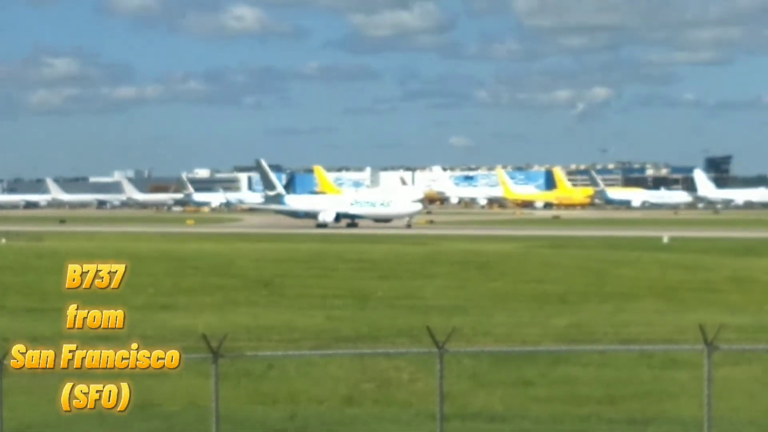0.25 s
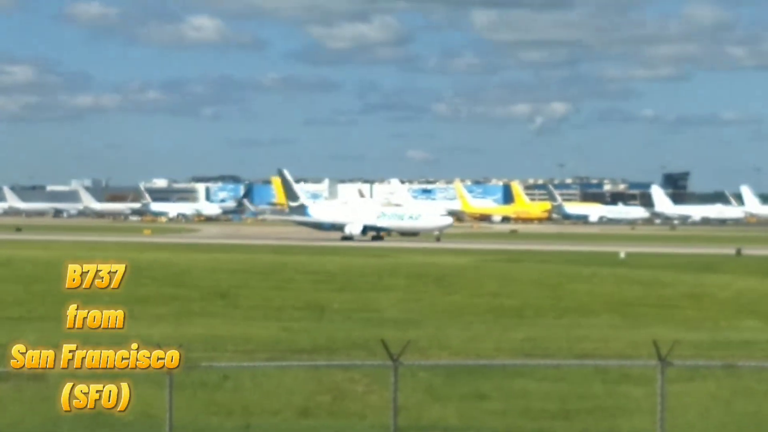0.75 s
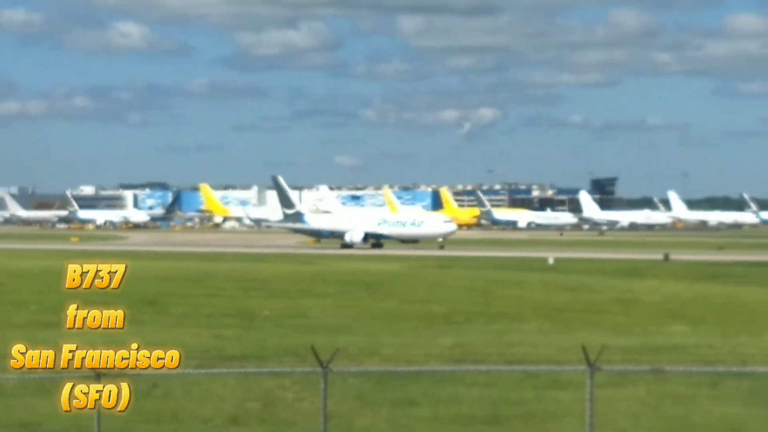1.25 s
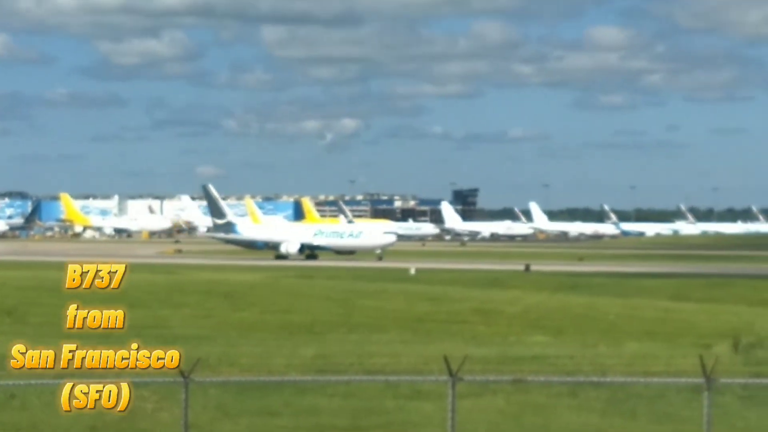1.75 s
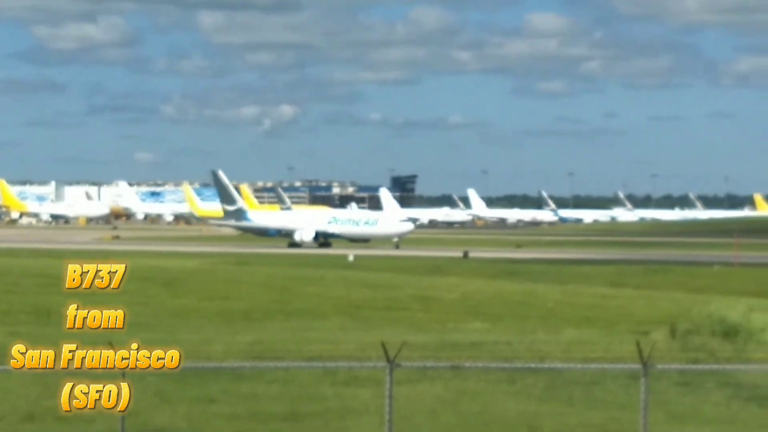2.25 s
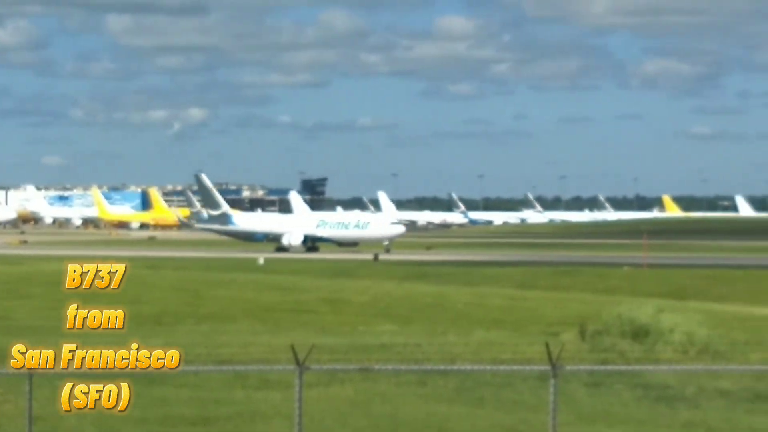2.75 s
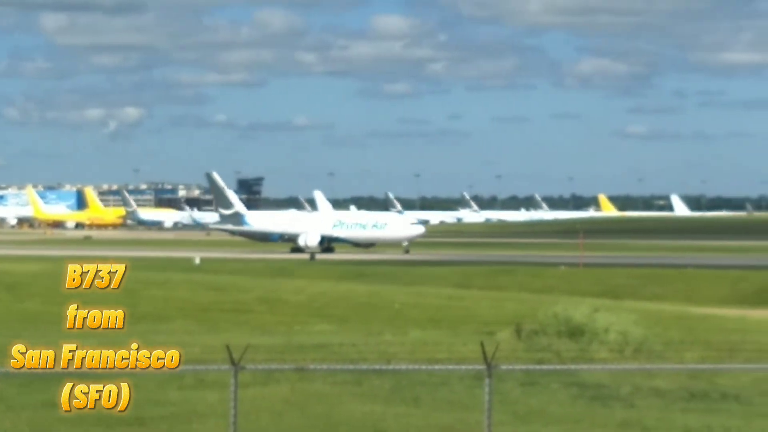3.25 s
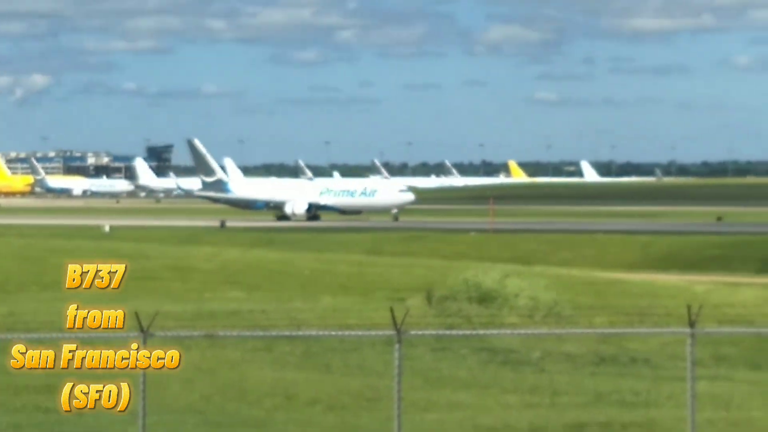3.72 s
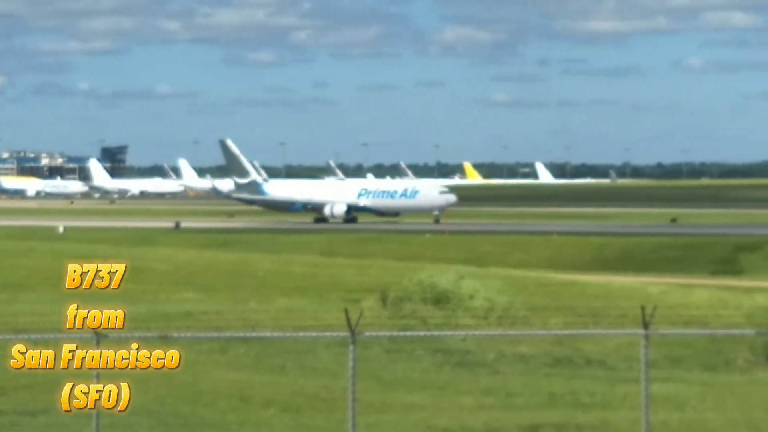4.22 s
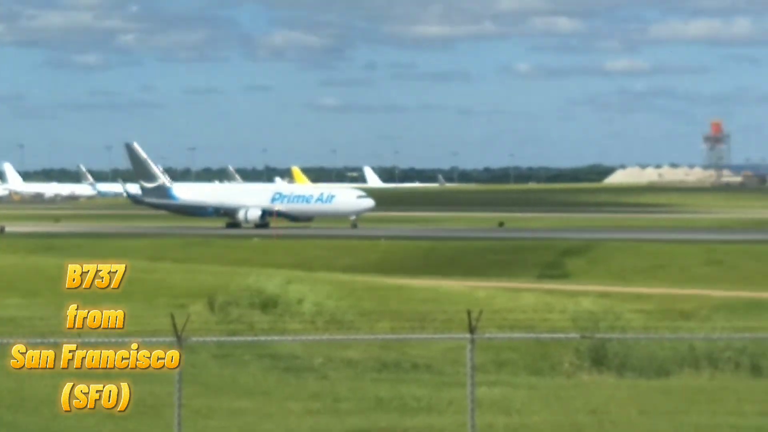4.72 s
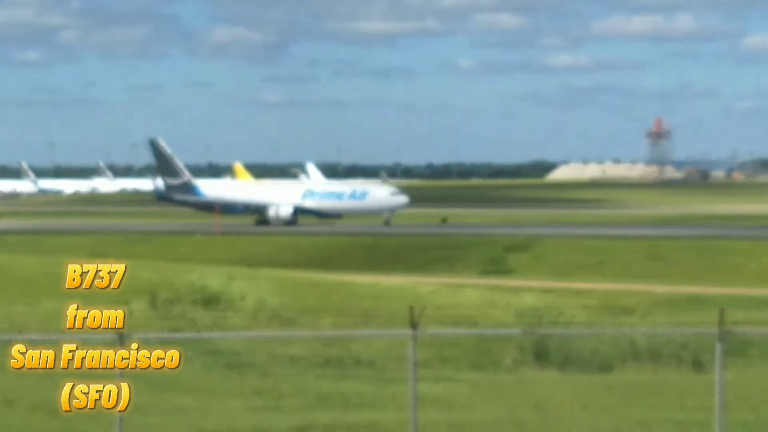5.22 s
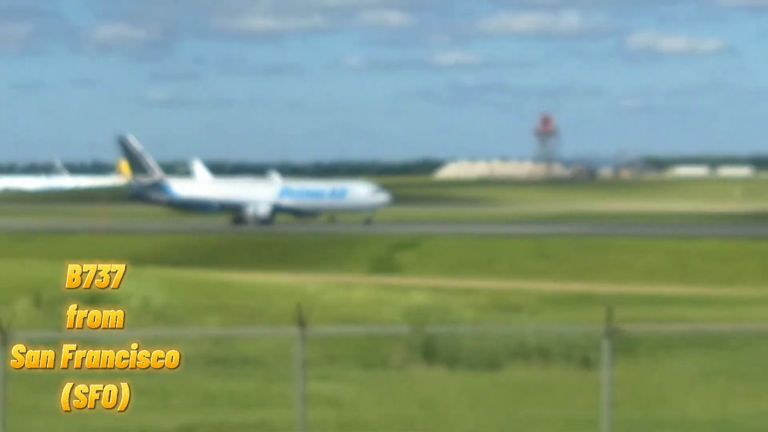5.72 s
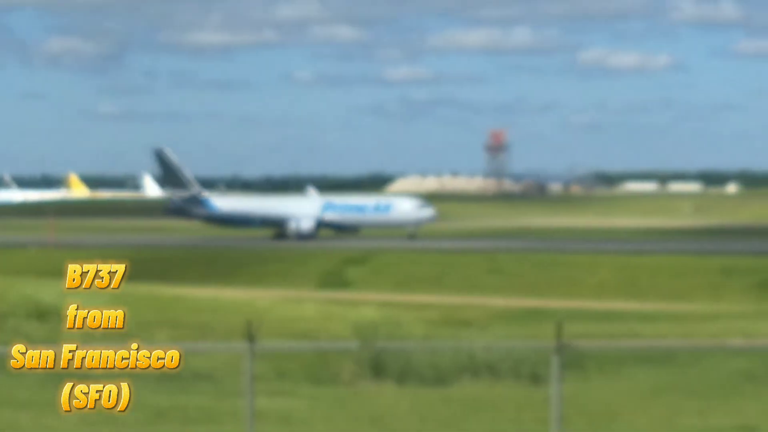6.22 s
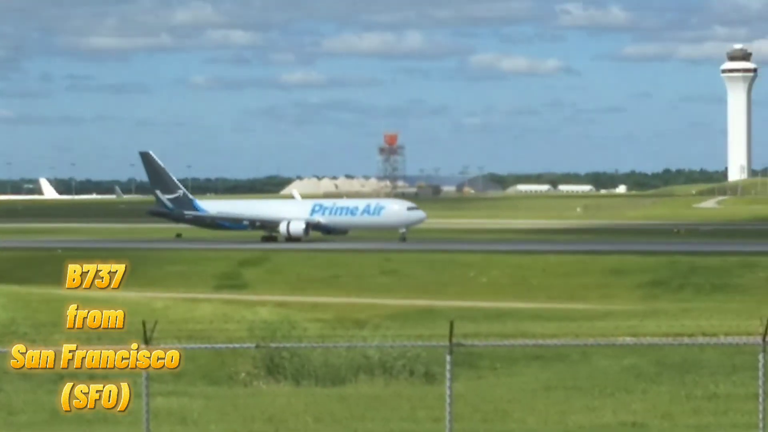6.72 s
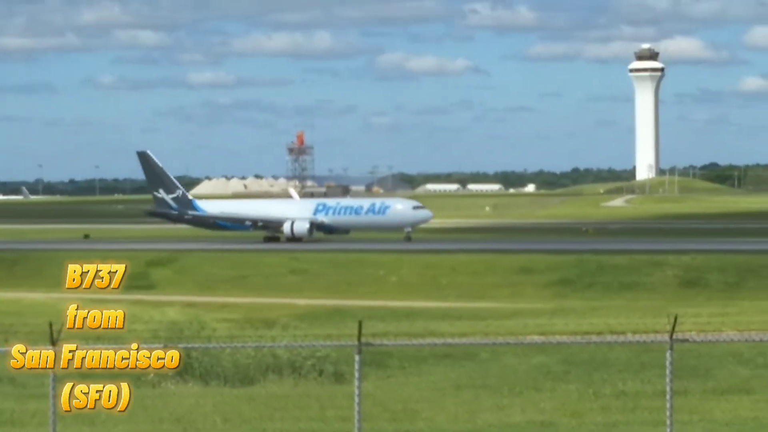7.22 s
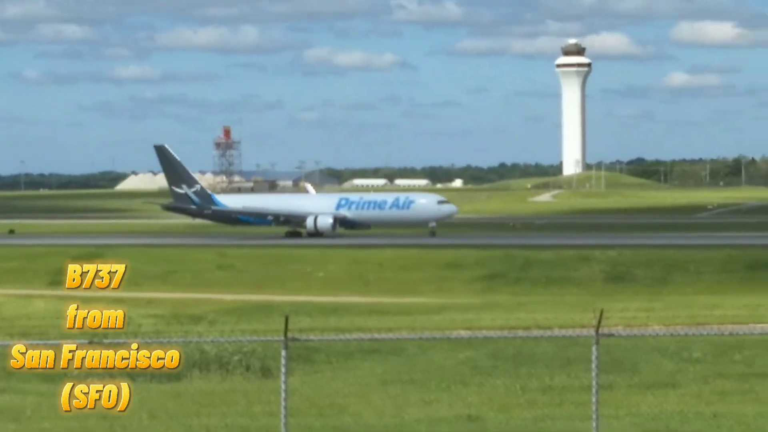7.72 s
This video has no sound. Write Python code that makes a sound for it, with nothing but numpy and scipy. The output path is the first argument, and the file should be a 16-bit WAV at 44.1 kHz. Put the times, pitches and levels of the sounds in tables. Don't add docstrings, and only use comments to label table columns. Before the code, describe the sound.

Two slightly detuned jet fans whine over a wide, airy roar across an open airfield. The whine holds, then slides smoothly lower while the roar weakens, leaving the tone more exposed. Close wind dominates the foreground with dull blows, tearing flutter and small knocks on each side of the stereo phone microphone. Two hard slams come in the first two seconds, momentarily pushing the sound down before it recovers.

```python
import sys
import numpy as np
from scipy import signal
from scipy.fft import rfft, irfft, next_fast_len
from scipy.io import wavfile
from scipy.ndimage import uniform_filter1d

SR = 44100
rng = np.random.default_rng(int(sys.argv[2]) if len(sys.argv) > 2 else 0)


def store_pcm(level_fs):
    pcm = np.round(np.clip(level_fs, -1, 1) * 32767).astype(np.int16)
    wavfile.write(sys.argv[1], SR, np.atleast_2d(pcm).T)


def boost_factor(decibels):
    exponent = np.asarray(decibels, float) / 20
    return 10 ** exponent


N = 351023
SIZE = next_fast_len(N + 2048)
HZ = np.arange(SIZE // 2 + 1) * SR / SIZE
TIME = np.arange(N) / SR


def unit(x):
    return x / np.sqrt(np.mean(x ** 2))


def curves(table):
    s, *columns = np.transpose(table)
    return [np.interp(TIME, s, c) for c in columns]


def over_hz(table, order):
    rows = np.array(table)
    return np.interp(np.log(HZ + 1), np.log(rows[:, 0]), rows[:, order])


def shape(x, response):
    padded = np.pad(x, (0, SIZE - N), "linear_ramp", end_values=x[0])
    return irfft(rfft(padded) * response, SIZE)[:N]


def walk(rate_hz):
    hold = int(SR / rate_hz)
    steps = np.repeat(rng.standard_normal(N // hold + 1), hold)
    return unit(uniform_filter1d(uniform_filter1d(steps, hold), hold)[:N])


# time in seconds, level in dB, treble lift in dB.
JET = [(0, -32.5, -11.5), (.8, -33.5, -6), (1.9, -33.5, -3.5), (2.7, -32.5, -4.5), (3.2, -32.5, -4),
       (3.7, -39, -2), (4.6, -37.5, -1.5), (5.05, -34.5, -0.5), (5.5, -39.5, 2), (6.3, -43, 6.5),
       (6.7, -42.5, 5), (7.45, -44.5, 7.5), (7.96, -46.5, 4.5)]
# frequency in Hz, density in dB per Hz.
ROAR_COLOUR = [(30, 8.5), (90, 18.5), (250, 7.5), (420, -1), (610, 4), (800, 2.5), (1050, -2.5),
               (1400, 1.5), (1800, 0), (2300, 1.5), (3000, -11), (3600, -11), (4500, -22.5), (5800, -39),
               (7500, -63)]


def roar():
    level_db, treble_db = curves(JET)
    gain_db = gain_control()
    body_db = 0.5 - 0.15 * gain_db
    white = rfft(rng.standard_normal((2, SIZE))) * boost_factor(over_hz(ROAR_COLOUR, order=1))
    out, swell = 0, walk(3.276)
    for octave in np.arange(-6, 3, .5):
        window = np.clip(1 - 2 * abs(np.log2((HZ + 1) / 2000) - octave), 0, 1)
        lift_db = treble_db * np.clip(octave - .5, 0, 1) + body_db * np.clip(.5 - octave, 0, 1)
        shimmer_db = .5 * swell + 0.33 * walk(5.0) + 0.95 * walk(14)
        out = out + irfft(white * window, SIZE)[:, :N] * boost_factor(lift_db + shimmer_db)
    return out * boost_factor(level_db + gain_db + 16.5)


# time in seconds, frequency in Hz, level in dB over the roar, overtone in dB re the tone.
FAN = [(0, 2130, -3, -26), (.7, 2115, -3, -26), (1.8, 2105, -7, -26), (3, 2090, -2, -26),
       (4.2, 2065, -2, -24), (4.95, 2062, 1, -22), (5.12, 2040, 2.5, -24), (5.5, 1922, 1.5, -22),
       (5.8, 1828, 5.5, -21), (5.95, 1782, 5.5, -18), (6.3, 1682, 3.5, -14), (6.7, 1580, 4, -17),
       (6.8, 1562, 5.5, -21), (7.1, 1525, 4.5, -22), (7.45, 1468, 2, -16), (7.96, 1415, -12, -20)]


def fans():
    hz, level_db, overtone_db = curves(FAN)
    out = 0
    for trim, lag, engine_db in ((1.004, 0, 1), (1.018, .26, -7)):
        speed = trim + lag * np.clip(1 - hz / 2060, 0, 1)
        smear = 1 + .0015 * walk(3) + .0022 * walk(25) + .011 * walk(170)
        phase = 2 * np.pi * np.cumsum(hz * speed * smear) / SR
        overtone = boost_factor(overtone_db + 1.6 * walk(12) + .6 * engine_db) * np.sin(2 * phase)
        tone = np.sin(phase) + overtone
        out = out + tone * boost_factor(engine_db + 1.9 * walk(18) + .9 * walk(6))
    return out * boost_factor(level_db + curves(JET)[0] + gain_control() + 1.5)


# frequency in Hz, gain in dB, phase in radians, likeness to the near port from 0 to 1.
SHADOW = [(60.4, -0.5, 0, 0.74), (400, 1, -0.33, 0.98), (840, -5, -0.5, 0.89), (1380, -2, -1.5, 0.5),
          (1740, -8, -2, 0.9), (2250, -13.5, -0.1, 0), (2665, 4.5, -1.24, 0.8), (3420, 1, -1.34, 1),
          (3570, 3.5, -2.5, 0.67), (4540, -3.5, -2.5, 0.26), (4810, 8, 3, 0.1), (6960, 7, -0.5, 0.3)]


def round_body(common, diffuse, tone):
    like = np.clip(over_hz(SHADOW, order=3), 0, 1)
    gain = boost_factor(over_hz(SHADOW, order=1))
    alike = shape(common, np.sqrt(like)) + tone
    bent = shape(alike, gain * np.exp(1j * over_hz(SHADOW, order=2)))
    return bent + shape(diffuse, gain * np.sqrt(1 - like))


def eddies(colour, even_s, spike_db, count):
    kicks = np.zeros(N)
    where = rng.integers(0, N, count)
    kicks[where] = rng.standard_normal(count) * boost_factor(spike_db * rng.exponential(1, count))
    x = shape(kicks, boost_factor(over_hz(colour, order=1)))
    span = int(even_s * SR)
    return x / np.sqrt(uniform_filter1d(uniform_filter1d(x ** 2, span), span) + 1e-12)


# frequency in Hz, density in dB per Hz.
THUMP = [(22, -69), (50, 3), (90, 4), (160, -1), (260, -11), (500, -28.5), (1500, -87)]
FLUTTER = [(350, -24), (700, -4.5), (1000, -5), (1300, -11.5), (2000, -31), (4000, -78)]
RUSTLE = [(110, -12), (260, 1), (500, -3.5), (800, -11.5), (1200, -25.5), (2000, -42), (4000, -88)]


def wind(gusts, thump_db, rustle_db):
    thump = boost_factor(thump_db + 3 * np.tanh(walk(14))) ** 2
    rustle = boost_factor(rustle_db + 4 * np.tanh(walk(40))) ** 2
    for s, low_db, high_db, ms in gusts:
        near = slice(max(int((s - .0014 * ms) * SR), 0), int((s + .0014 * ms) * SR))
        bump = np.exp(-.5 * ((TIME[near] - s) / (0.00028 * ms)) ** 2)
        thump[near] += boost_factor(low_db) ** 2 * bump
        rustle[near] += boost_factor(high_db) ** 2 * bump ** 3.5
    low = boost_factor(-1.5) * np.sqrt(thump) * eddies(THUMP, even_s=0.0097, spike_db=-0.5, count=6000)
    flutter = boost_factor(4.5) * rustle ** 0.9 * eddies(FLUTTER, even_s=0.0097, spike_db=4.0, count=9000)
    return low + flutter + np.sqrt(rustle) * eddies(RUSTLE, even_s=0.0095, spike_db=5.5, count=9000)


# gust time in seconds, thump in dB, rustle in dB, length in ms.
GUSTS_NEAR = [(0.082, -21, -39, 47), (0.308, -11.5, -28, 24), (0.655, -14, -33, 32), (0.848, -9, -29, 33),
              (1.497, -6.5, -18.5, 27), (1.637, -24.5, -31, 110), (1.73, -20, -54, 22),
              (2.132, -46, -30, 200), (3.116, -19, -35, 50), (3.592, -20, -26.5, 160),
              (3.751, -24, -30, 68), (4.059, -15.5, -24.5, 160), (4.249, -18, -32, 19),
              (4.612, -12, -24, 20), (4.748, -9.5, -20.5, 29), (5.036, -29, -16, 9), (5.086, -16, -34, 28),
              (5.215, -19, -42, 64), (5.38, -14, -35, 45), (5.517, -12.5, -43, 34), (5.59, -16, -40, 53),
              (5.819, -6.5, -19, 24), (5.884, -12.5, -47, 150), (6.351, -29, -40, 35),
              (6.515, -23, -41, 29), (6.639, -21, -51, 75), (7.079, -14.5, -28.5, 110),
              (7.447, -21.5, -54, 170), (7.66, -8, -26, 58), (7.805, -14.5, -26, 140)]


def near_wind(near_db):
    return wind(GUSTS_NEAR, near_db, near_db - 34.0)


# gust time in seconds, thump in dB, rustle in dB, length in ms.
GUSTS_FAR = [(0.147, -14, -23, 8.6), (0.327, -7.5, -15, 17), (0.395, -8.5, -27, 30),
             (0.55, -13.5, -24, 270), (0.837, -15, -23, 78), (1.366, -20, -14.5, 50),
             (1.44, -21, -18.5, 70), (1.492, -17, -15, 17), (7.11, -20, -21.5, 36), (6.975, -16, -24.5, 25),
             (7.397, -14.5, -22, 22), (7.95, -14, -20, 23), (1.739, -42, -27.5, 380),
             (2.531, -14.5, -18.5, 21), (3.032, -15, -25.5, 110), (3.224, -14, -19, 130),
             (3.64, -14, -16, 22), (1.92, -27, -24.5, 73), (3.79, -17.5, -19, 140), (4.211, -13, -21.5, 31),
             (4.4, -13, -18, 51), (4.425, -11.5, -28, 33), (4.03, -14, -26, 50), (4.506, -11, -19.5, 19),
             (4.603, -11, -19, 19), (4.794, -21, -19, 31), (4.991, -17, -24, 50), (5.14, -9, -35, 27),
             (5.36, -12, -18, 42), (5.653, -7.5, -26, 55), (6.063, -11, -20.5, 40), (6.195, -15, -21.5, 87),
             (6.336, -11, -17.5, 8.2), (6.717, -5, -18, 20), (7.0, -15, -32, 33), (7.349, -8, -22, 11),
             (7.515, -11, -17.5, 21), (7.578, -11.5, -27.5, 29), (7.712, -12.5, -22, 53)]


def far_wind(far_db, rustle_db):
    return wind(GUSTS_FAR, far_db, rustle_db)


# time in seconds, strength in dB.
DRAUGHT = [(0, -12), (.78, -31.5), (1.0, -39), (1.15, -12), (1.26, -37), (1.33, -14.5), (1.55, -6.5),
           (1.95, -15), (2.4, -15), (2.85, -42), (3.2, -14), (3.45, -21), (5.4, -17.5), (5.55, -26.5),
           (6.3, -16), (6.9, -17.5), (7.3, -20.5), (7.96, -11.5)]
# start in seconds, length in seconds, rustle in dB.
BLASTS = [
    (1.313, 0.18, -20),
    (3.102, 0.17, -25.5),
    (3.598, 0.44, -24),
    (7.578, 0.22, -27.5),
    (7.912, .1, -22),
]


def draught():
    far_db = curves(DRAUGHT)[0] + gain_control()
    rustle = boost_factor(-36 + 0.6 * (far_db + 17.5)) ** 2
    for s, length_s, db in BLASTS:
        ramp = np.clip(np.minimum(TIME - s, s + length_s - TIME) / 0.016, 0, 1)
        rustle = rustle + boost_factor(db) ** 2 * ramp
    near_db = -29.5 + 0.42 * (far_db + 22.0)
    return near_db, far_db, 10 * np.log10(rustle)


def rings(table, cycles, late_s=.002):
    out = np.zeros(N)
    for s, db, hz in table:
        near = slice(max(int((s - .03) * SR), 0), int((s + .03) * SR))
        t = TIME[near] - s - late_s
        out[near] += boost_factor(db + 0.5) * np.exp(-(t * hz / cycles) ** 2) * np.sin(2 * np.pi * hz * t + 1.96)
    return out


# time in seconds, peak in dB, ring in Hz.
SLAMS = [
    (.846, -7, 95),
    (1.495, -4, 105),
]


def slams():
    return rings(SLAMS, cycles=0.59)


# time in seconds, peak in dB, ring in Hz.
SNAPS = [(0.14, -28, 806), (0.32, -12, 380), (1.325, -12, 796), (1.353, -8, 580), (1.408, -9, 815),
         (3.375, -14, 228), (3.611, -15, 668), (3.632, -20, 420), (3.695, -16, 565), (3.739, -11, 696),
         (3.786, -23, 571), (3.874, -16, 468), (3.929, -10.5, 730), (3.97, -14, 519), (4.011, -14, 511),
         (4.047, -16, 540), (4.393, -10, 540), (4.447, -14, 487), (5.131, -19, 700), (5.294, -11, 330),
         (5.322, -9, 342), (5.348, -10, 600), (5.354, -10.5, 400), (5.637, -12.5, 480), (6.056, -14.5, 567),
         (7.098, -15, 560), (1.361, -10, 680), (1.425, -11, 750), (1.453, -14, 800), (1.48, -19, 900),
         (1.774, -17, 401), (1.96, -24, 705), (2.135, -17, 328), (2.79, -20, 686), (3.642, -13, 400),
         (3.762, -15, 550), (3.817, -19, 400), (3.942, -13, 380), (4.372, -18, 592), (4.539, -19, 630),
         (5.819, -12, 345), (5.885, -17, 190), (5.971, -16, 237), (6.163, -24, 353), (6.22, -14, 350),
         (6.429, -13.5, 298), (6.965, -29, 300), (6.985, -20, 200), (7.045, -19, 350), (7.143, -20, 320),
         (7.269, -18, 371), (7.436, -24, 347), (7.597, -13.5, 450), (7.648, -14, 250), (7.707, -18, 497),
         (7.387, -18, 696), (7.506, -16.5, 740), (7.577, -13.5, 646), (7.813, -13.5, 710),
         (7.924, -12, 791)]


def snaps():
    return rings(SNAPS, cycles=1.0)


# time in seconds, peak in dB, ring in Hz, left over right in dB.
KNOCKS = [(0.228, -20, 105, 1.5), (0.439, -17.5, 325, -1.5), (1.322, -20, 72.7, -2), (1.483, -22, 105, 0.0),
          (2.101, -26, 316, -3.0), (2.163, -28.5, 110, -2.5), (2.243, -25, 144, -1.5),
          (2.52, -23, 293, -2.0), (2.955, -24, 186, -2), (3.364, -18.5, 118, -2.5), (3.747, -21, 266, -1.5),
          (3.878, -20.5, 100, 0.5), (4.205, -27, 72.7, 0.0), (4.205, -19, 120, -1.5),
          (4.356, -20, 132, 2.0), (4.398, -12, 99.6, -2.5), (4.488, -18.5, 132, -1.5),
          (4.591, -22, 121, 0.5), (4.785, -22, 124, 2.0), (4.872, -27, 129, -2.0), (5.018, -21, 148, -2.5),
          (5.286, -16, 237, -2.0), (5.452, -21, 87, -3.0), (5.576, -21, 99.6, -3.0),
          (5.634, -21, 148, -2.0), (5.729, -26, 124, 0.5), (5.809, -17, 129, -2), (5.878, -22, 186, 1.0),
          (6.062, -19, 174, -1.5), (6.323, -27, 88.8, -3.0), (6.427, -33, 72.7, 6.5),
          (6.427, -22, 108, -2.0), (6.703, -16.5, 137, -2.5), (6.973, -31, 210, -2), (7.036, -19, 140, -2),
          (7.236, -20.5, 160, -2.0), (7.331, -17, 96.9, -2.5), (7.494, -21, 250, -1),
          (7.561, -20, 230, -1.5), (7.639, -16, 110, 1.0)]


def knocks(sign):
    rows = [row[:3] for row in KNOCKS if row[3] * sign >= 0]
    return boost_factor(7) * rings(rows, cycles=0.91, late_s=0.0041)


# time in seconds, length in seconds, centre in Hz, width in Hz, level in dB.
NEARBY = [(.505, .005, 5700, 1200, -66), (.523, .005, 5600, 1200, -65), (.63, .08, 9450, 600, -66),
          (.62, .04, 8000, 500, -73), (.66, .14, 14000, 1400, -72), (.803, .006, 5400, 1000, -65),
          (1.03, .18, 5450, 160, -69), (1.34, .05, 5450, 250, -66), (3.894, .002, 6500, 3000, -54),
          (3.905, .015, 6500, 2500, -69), (6.1, .17, 7800, 1400, -76)]


def nearby():
    out, half = np.zeros(N), 16384
    white = rfft(rng.standard_normal(2 * half))
    freq = np.arange(half + 1) * SR / (2 * half)
    ragged = boost_factor(2.5 * walk(30))
    for s, length_s, hz, width_hz, db in NEARBY:
        near = slice(int(s * SR) - half, int(s * SR) + half)
        band = unit(irfft(white * np.exp(-.5 * ((freq - hz) / (.5 * width_hz)) ** 2)))
        out[near] += boost_factor(db) * band * np.exp(-((TIME[near] - s) / length_s) ** 2)
    return out * ragged


# time in seconds, drop in dB.
DUCKS = [
    (.41, 3.5),
    (0.856, 8.5),
    (1.4, 5.5),
    (1.5, 9.5),
    (3.249, 2.5),
    (5.38, 1.5),
    (5.821, 5),
    (6.715, 6.5),
    (7.51, 2),
    (7.669, 3.5),
]


def gain_control():
    recover_db_per_s = 11
    db = np.zeros(N)
    for s, drop_db in DUCKS:
        i = int(s * SR)
        db[i:] = np.minimum(db[i] - drop_db + recover_db_per_s * (TIME[i:] - s), 0)
    return uniform_filter1d(db, size=800)


def patchy(noise):
    bins, frames = 8, 2
    z = signal.stft(noise, nperseg=1024)[2]
    patches = rng.standard_normal((2, z.shape[1] // bins + 1, z.shape[2] // frames + 1))
    patches = np.repeat(np.repeat(patches, bins, axis=1), frames, axis=2)
    patches = patches[:, :z.shape[1], :z.shape[2]]
    return signal.istft(z * boost_factor(2.8 * np.clip(patches, -3, 1)), nperseg=1024)[1][:, :N]


def capsule_hiss():
    level_db = -72.0 + 0.2 * gain_control() + .7 * walk(12)
    same, opposite = rng.standard_normal((2, N)) * boost_factor(level_db)
    return same + boost_factor(0.5) * opposite * np.array([[1], [-1]])


# frequency in Hz, share from 0 to 1.
CROSS_GAIN = [(60, .79), (500, .88), (1100, .9), (2400, .88), (3500, .76), (4700, .86), (7100, .8),
              (9000, .78), (12000, .7), (14500, .4)]


def widen(ports, wander):
    lag_samples = 18.63
    delay = over_hz(CROSS_GAIN, order=1) * np.exp(-2j * np.pi * HZ * lag_samples / SR)
    near, far = ports
    return np.array([near - wander * shape(far, delay), far - wander * shape(near, delay)])


# frequency in Hz, level in dB over the left.
RIGHT_SIDE = [(60, .3), (1000, .1), (9000, 1.2), (13000, 3.6)]


def limits(left, right):
    sides = np.array([left, shape(right, boost_factor(over_hz(RIGHT_SIDE, order=1)))])
    sides = signal.sosfilt(signal.butter(3, 43, "high", fs=SR, output="sos"), sides)
    return sides / (1 + sides ** 8) ** (1 / 8)


def scene():
    common, diffuse = roar()
    tone = fans()
    near_db, far_db, rustle_db = draught()
    small = boost_factor(-2.5) * nearby()
    near = common + tone + 0.92 * small
    near = near + knocks(sign=1) + slams() + near_wind(near_db)
    far = round_body(common, diffuse, tone) + small
    far = far + knocks(sign=-1) + snaps() + far_wind(far_db, rustle_db)
    return np.array([near, far])


def top_cut(x):
    return signal.sosfilt(signal.butter(12, 15500, fs=SR, output="sos"), x)


def record(dry):
    hiss = capsule_hiss()
    wander = boost_factor(1.1 * walk(11))
    left, right = widen(hiss, wander)
    mid, side = patchy(np.array([left + right, left - right]) / 2)
    left, right = widen(dry, wander) + np.array([mid + side, mid - side])
    return top_cut(limits(left, right))


dry = scene()
out = record(dry)
store_pcm(out)
```